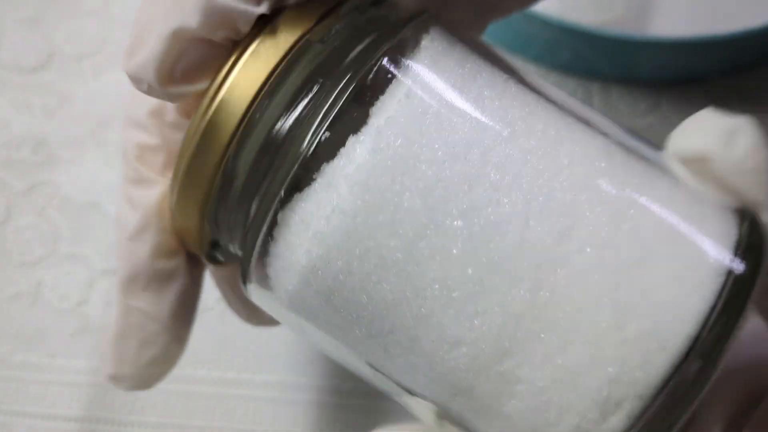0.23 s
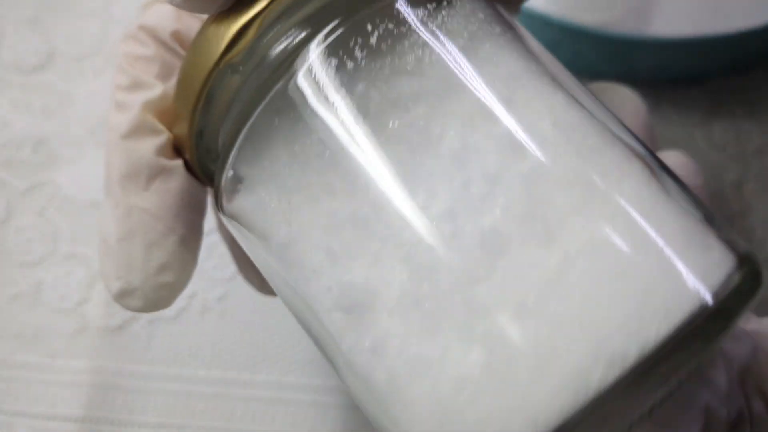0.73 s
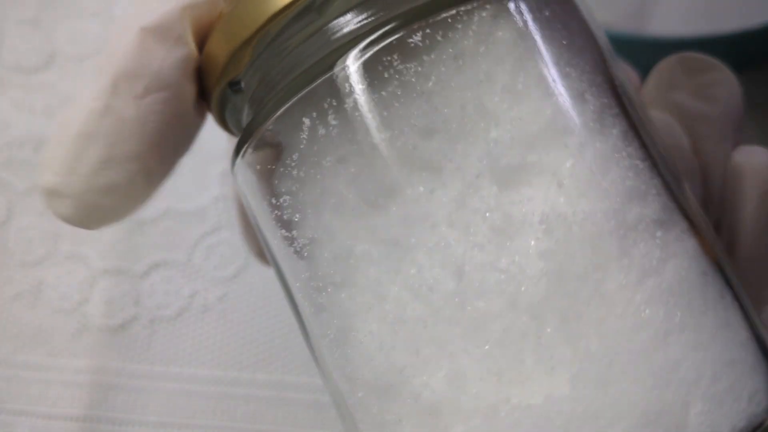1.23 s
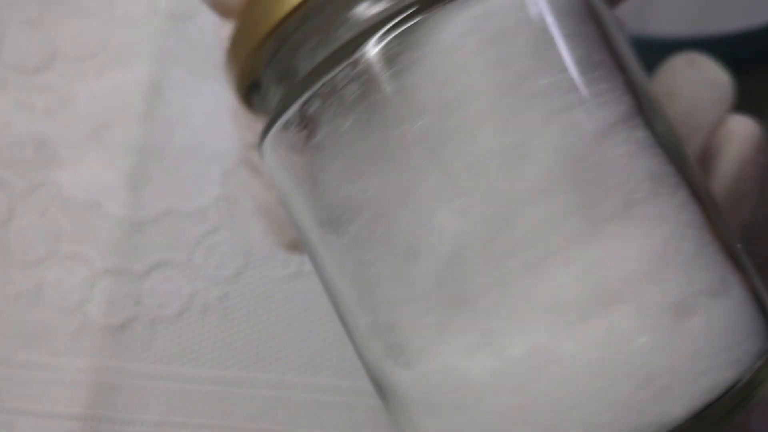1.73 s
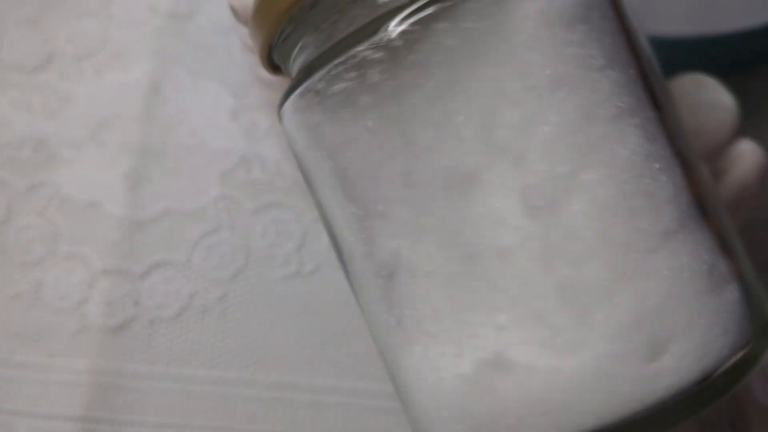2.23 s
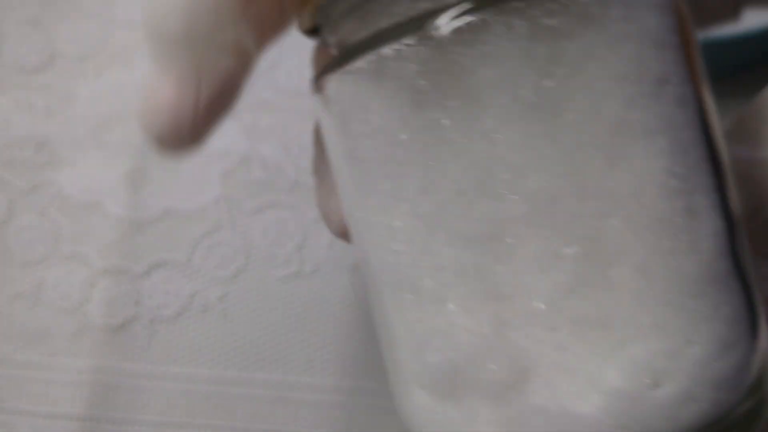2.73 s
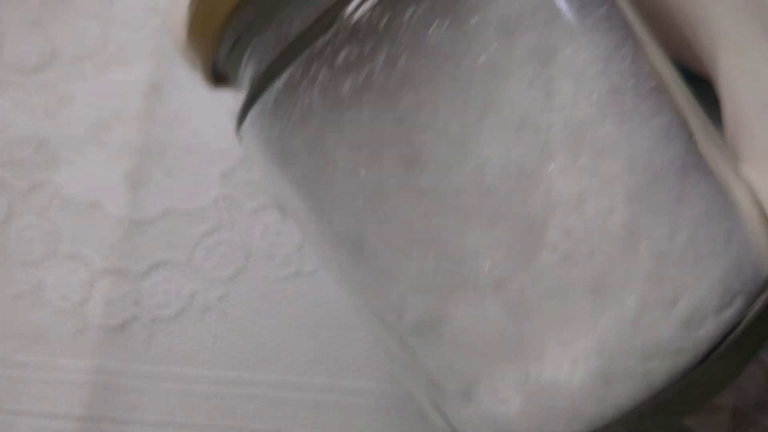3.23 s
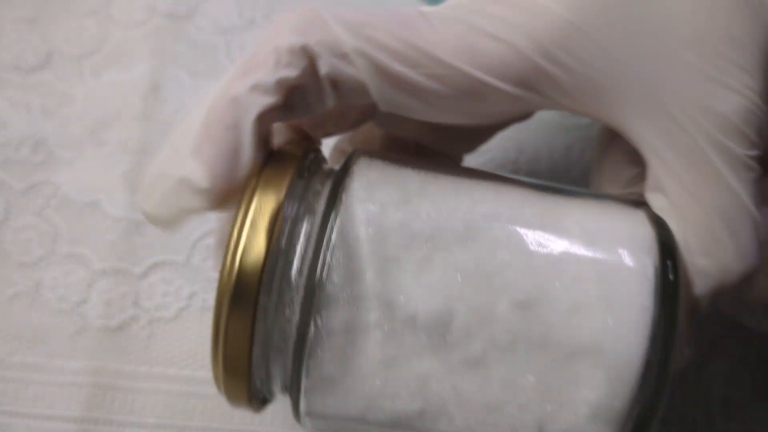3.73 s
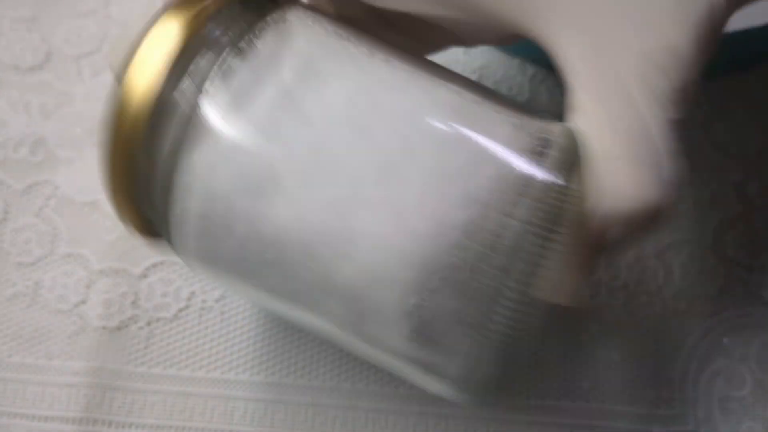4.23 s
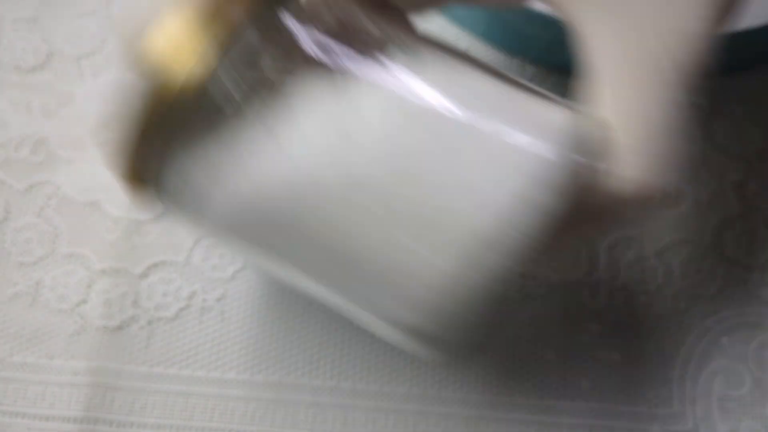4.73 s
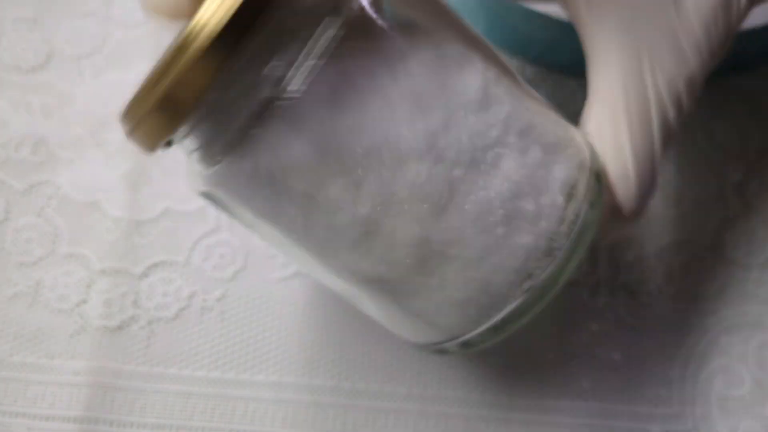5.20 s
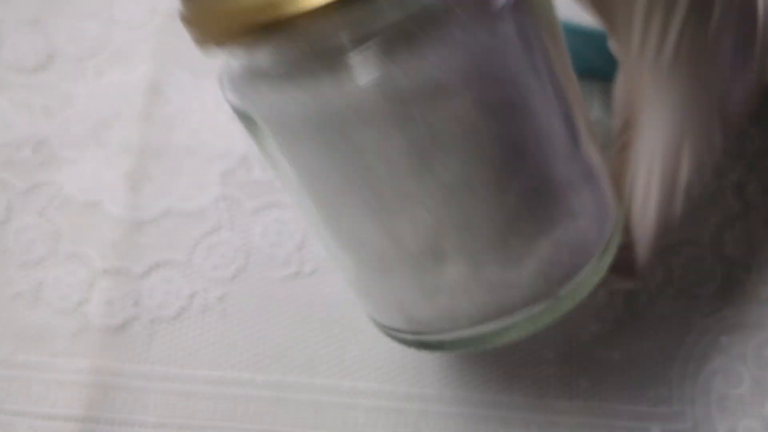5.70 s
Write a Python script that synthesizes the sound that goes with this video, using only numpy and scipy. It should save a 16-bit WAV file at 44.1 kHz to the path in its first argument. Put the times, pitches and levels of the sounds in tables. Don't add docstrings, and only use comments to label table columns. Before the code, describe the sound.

Gloved hands turn a glass jar of fine powder very close to a stereo microphone. Rubber ticks and a short glassy finger squeak come first, then soft sandy slides in slow turns. The jar is tipped, its metal lid knocks once, and five brisk shakes slam the powder with crisp clicks. Gritty slides finish it, over quiet room rumble and faint distant tyre hiss.

```python
import sys
import numpy as np
from scipy import signal
from scipy.io import wavfile
from scipy.ndimage import uniform_filter1d

SR = 44100
rng = np.random.default_rng(int(sys.argv[2]) if len(sys.argv) > 2 else 0)


def bounce(signal):
    frames = np.transpose(np.atleast_2d(signal))
    limited = np.clip(frames, -1, 1)
    pcm = np.round(limited * 32767).astype(np.int16)
    wavfile.write(sys.argv[1], SR, pcm)


def ratio_of_db(decibels):
    return 10 ** (np.asarray(decibels, float) / 20)


N = 262836
LEAD = 8


def evened(x):
    return x / np.sqrt(np.mean(np.atleast_2d(x).mean(0) ** 2) + 1e-20)


def read(points, hz):
    f, value = np.transpose(points)
    return np.interp(np.log(hz + 1), np.log(f + 1), value)


def follow(points):
    return ratio_of_db(np.interp(np.arange(N) / SR, *np.transpose(points)))


def ears(x, pan_db, lead):
    return np.array([x * ratio_of_db(pan_db / 2), np.roll(x, lead) * ratio_of_db(-pan_db / 2)])


def echoes(x, t60, db):
    t = np.arange(6000) / SR
    sparse = rng.random((2, 6000)) < .08
    taps = rng.standard_normal((2, 6000)) * sparse * ratio_of_db(-60 * t / t60) * (t > .0008)
    taps *= ratio_of_db(db) / np.linalg.norm(taps, axis=1)[:, None]
    return x + signal.oaconvolve(x, taps, axes=1)[:, :N]


# freq_hz, likeness (0 to 1)
PORT_LIKENESS = [(60, 1.0), (180, 0.97), (550, 0.56), (1650, 0.032), (4970, 0.0), (15000, 0.92)]


def hiss(spectrum, patchy_db, size):
    hz = np.fft.rfftfreq(size, 1 / SR)
    a, b, c, d, patches = rng.standard_normal((4 * N // size + 5, len(hz), 5)).T
    patches = uniform_filter1d(uniform_filter1d(patches, size=8, axis=0), size=6, axis=1)
    same = np.clip(read(PORT_LIKENESS, hz), -1, 1)[:, None]
    left = a + 1j * b
    right = same * left + np.sqrt(1 - same ** 2) * (c + 1j * d)
    outside = (hz < spectrum[0][0]) | (hz > spectrum[-1][0])
    gain_db = np.where(outside, -120, read(spectrum, hz))
    z = np.array([left, right]) * ratio_of_db(gain_db[:, None] + patchy_db * patches / patches.std())
    return evened(signal.istft(z, nperseg=size, noverlap=3 * size // 4)[1][:, :N])


# freq_hz, density_db (per Hz)
RUMBLE = [(24, -32), (36, -33), (45, -5), (62, 1), (75, -6), (100, -5), (112, -12), (137, -17),
          (165, -20.5), (210, -30.5), (330, -38.5)]
# freq_hz, density_db (per Hz)
FAN_BAND = [(105, -10.5), (115, -5), (125, 9.5), (133, -5), (140, -38)]
# time_s, level_db
FAN_LEVEL = [(0.0, -57), (0.58, -50), (1.16, -63), (1.23, -52), (1.84, -65.5), (2.87, -59), (4.81, -58.5),
             (5.96, -67)]


def building():
    rumble = ratio_of_db(-50) * hiss(RUMBLE, patchy_db=3.0, size=8192)
    hum = ratio_of_db(-56) * np.sin(2 * np.pi * 64 * np.arange(N) / SR)
    fan = ratio_of_db(-1) * follow(FAN_LEVEL) * hiss(FAN_BAND, patchy_db=-3.0, size=8192)
    return rumble + hum + fan


# freq_hz, density_db (per Hz)
ROOM_AIR = [(120, -5), (200, -28), (340, 7), (557, -6), (863, -81), (964, 6.5), (1310, -5), (2190, 3),
            (4010, -6), (7070, -1), (15800, -65)]


def room_air():
    return ratio_of_db(-78) * hiss(ROOM_AIR, patchy_db=1.5, size=1024)


# freq_hz, density_db (per Hz)
TYRE_HISS = [(230, -8), (400, -7.5), (560, -24.5), (700, -8.5), (850, -11), (975, 5), (1110, -5),
             (2000, -18), (4000, -27)]
# time_s, level_db
TYRE_LEVEL = [
    (0.0, -68),
    (1.61, -69),
    (2.92, -79),
    (3.2, -75),
    (3.73, -83.5),
    (5.13, -87),
    (5.33, -93),
    (5.68, -94),
    (5.96, -71),
]


def far_tyres():
    return follow(TYRE_LEVEL) * hiss(TYRE_HISS, patchy_db=1.0, size=512)


def grains():
    per_s, spread_db = 5000, 2.5
    crowding = uniform_filter1d(uniform_filter1d(rng.standard_normal(N), size=150), size=150)
    crowding = ratio_of_db(2.7 * crowding / crowding.std())
    out = np.zeros((2, N))
    for lead in (0, 3, 7, 8, 9, 16):
        size = ratio_of_db(spread_db * np.minimum(rng.exponential(1, N), 5)) * rng.choice([-1, 1], N)
        landing = rng.random(N) < per_s / 6 / SR
        out += echoes(ears(crowding * size * landing, 0, lead), t60=0.053, db=1.5)
    return out


# middle_s, length_s, grit_db,
# fineness_db
HEAP_SLIDES = [(.5, .064, -80, -28), (0.58, 0.14, -54, -1), (0.613, 0.072, -59, -8), (0.645, 0.07, -62, -4),
               (0.712, 0.13, -65, -5), (1.411, .12, -64.5, -16), (1.492, 0.053, -58.5, -16),
               (1.561, 0.22, -56.5, -3), (1.552, 0.1, -55, -0.5), (1.672, 0.26, -69, -5.5), (1.76, 0.13, -71, 3),
               (1.921, 0.23, -62, -1.5), (1.971, 0.066, -58.5, -6.5), (2.159, 0.13, -66, -5.5),
               (2.194, 0.058, -61.5, -5.5), (2.306, 0.037, -67, -5.5), (2.44, 0.14, -75, 5.5),
               (2.54, 0.32, -66.5, 0.5), (2.629, 0.083, -63, -1.5), (2.69, 0.13, -68.5, -4.5),
               (3.053, 0.25, -65, -11), (3.136, 0.2, -63.5, 0), (3.255, 0.18, -64, -7), (3.45, 0.42, -72.5, -1.5),
        (3.543, 0.2, -66.5, -5.5), (3.773, 0.08, -69.5, -16), (3.859, 0.05, -67.5, -9.5),
        (3.994, 0.16, -68, -15), (4.046, 0.09, -62.5, -6.5), (4.103, 0.064, -63, 0.5),
        (4.154, 0.21, -60, -3.5), (5.285, 0.18, -67, -4), (5.43, .3, -89, -1), (5.55, .1, -72.5, -1),
        (5.581, 0.072, -67, 7.5), (5.726, 0.11, -57.5, -9.5), (5.761, 0.047, -59.5, -1.5),
        (5.816, 0.21, -64, -6.5), (5.884, 0.068, -52.5, -3.5), (5.929, 0.11, -52.5, -4.5)]
# middle_s, throw_length_s, throw_db, return_db, whisk_db
SHAKES = [
    (4.331, .11, -56.5, -70, -84),
    (4.515, 0.099, -51.5, -70, -69.5),
    (4.703, 0.078, -48.5, -69.5, -65.5),
    (4.892, 0.098, -53.5, -68, -65.5),
    (5.09, 0.082, -49.5, -69, -64.5),
]


def slides():
    rows = [(*row, 0) for row in HEAP_SLIDES]
    for s, length, throw_db, return_db, _ in SHAKES:
        rows.append((s, length, throw_db, -2, 3))
        rows.append((s, 1.55 * length, throw_db - 6, -2, 0))
        rows.append((s + 0.1, 0.24, return_db, 0.5, 0))
    return rows


# time_s, trickle_db, pan_db (left-right)
FLOW = [(0.0, -78.5, -4), (0.63, -65.5, 2), (0.8, -76.5, -3.5), (1.191, -77, -0.5), (1.64, -64, -1),
        (2.16, -69.5, -1), (2.46, -64, 1), (2.97, -75, -1.5), (3.24, -66, -2), (3.67, -74, 1),
        (5.0, -75.5, 1), (5.51, -75, -1), (5.96, -87, 1.5)]
# freq_hz, density_db (per Hz)
POWDER = [(400, 2.5), (650, -13), (1300, 5), (1900, -1.5), (3000, 1), (5400, -2.5), (6800, -5.5), (8000, 0),
          (10000, -10.5), (12500, -6.5), (14000, -11.5), (15800, -15.5)]
# freq_hz, width_hz, level_db
WALL = [(673, 138, 12), (1935, 150, 6), (3900, 1000, -20), (7730, 530, -6), (10800, 1000, -12)]
BAND_EDGES = [450, 2000, 6500, 9500, 15800]
TRICKLE = [-9, -4.5, -8, -18.5]
BAND_PAN = [0, 1.5, 2, 3]


def powder(rain):
    hz, _, z = signal.stft(rain, SR, nperseg=256)
    drift = rng.standard_normal(z.shape[1:])
    drift = uniform_filter1d(uniform_filter1d(drift, size=5, axis=0), size=12, axis=1)
    wall = 1 + sum(ratio_of_db(db) / (1 + (2 * (hz - f) / width) ** 2) for f, width, db in WALL)
    z = z * (ratio_of_db(read(POWDER, hz)) * wall)[:, None] * ratio_of_db(2.4 * drift / drift.std())
    coloured = signal.istft(z, SR, nperseg=256)[1][:, :N]

    t = np.arange(N) / SR
    s, trickle_db, pan_db = np.transpose(FLOW)
    power = np.outer(ratio_of_db(TRICKLE), ratio_of_db(np.interp(t, s, trickle_db))) ** 2
    for middle, length, grit_db, fine_db, extra_db in slides():
        at = slice(round((middle - length / 2) * SR) + 1, round((middle + length / 2) * SR) - 1)
        swell = np.cos(np.pi * (t[at] - middle) / length) ** 3.2
        weight_db = extra_db - 6 - 0.4654 * (grit_db + 67.5)
        slide_db = 3.5 + 1.02 * fine_db
        bands_db = grit_db + np.array([weight_db, 0, slide_db, fine_db])
        power[:, at] += np.outer(ratio_of_db(bands_db), swell) ** 2

    out = np.zeros((2, N))
    for low, high, level, beam_db in zip(BAND_EDGES, BAND_EDGES[1:], np.sqrt(power), BAND_PAN):
        split = signal.butter(3, [low, high], "bp", fs=SR, output="sos")
        band = signal.sosfilt(split, coloured)
        out += evened(band * ratio_of_db([[beam_db / 2], [-beam_db / 2]])) * level
    return out * ratio_of_db(np.outer([.5, -.5], np.interp(t, s, pan_db)))


def crackle():
    per_s, level_db = 40, -69
    t = np.arange(300) / SR
    size = ratio_of_db(level_db + 3.4 * np.minimum(rng.exponential(1, N), 4)) * (rng.random(N) < per_s / SR)
    kind = rng.integers(0, 4, N)
    out = np.zeros((2, N))
    for k, hz in enumerate((2200, 3260, 4600, 6800)):
        pop = ratio_of_db(-60 * t / .0018) * np.sin(2 * np.pi * hz * t)
        out += ears(signal.oaconvolve(size * (kind == k), pop)[:N], 1.8, 3 * k - 2)
    return out


def ticks(rows):
    t, out = np.arange(800) / SR, np.zeros((2, N + 800))
    snap = signal.butter(2, [900, 8000], "bp", fs=SR)
    for s, db, hz, pan_db, share in rows:
        burst = rng.standard_normal(800) * ratio_of_db(-60 * t / .004)
        ring = signal.lfilter(*signal.iirpeak(hz, 1 / np.clip(share, .05, 1.5), SR), burst)
        tick = ring + 0.031 * signal.lfilter(*snap, burst)
        soft = signal.butter(1, min(3.2 * hz, .4 * SR), fs=SR)
        tick = signal.lfilter(*soft, tick)
        out[:, round(s * SR):][:, :800] += ears(ratio_of_db(db + 3) * tick / abs(tick).max(), pan_db, LEAD)
    return out[:, :N]


# start_s, peak_db, pitch_hz, pan_db (left-right)
GLOVE_TICKS = [(.2194, -59.5, 2690, 11), (0.2985, -52, 2960, -18), (0.317, -45.5, 1810, 3),
               (.331, -45, 5330, -4), (0.338, -55.5, 3280, 23), (0.412, -56.5, 2450, 18),
               (0.644, -42, 9000, 6), (0.968, -53.5, 2480, 0), (1.051, -47.5, 2490, 2),
               (1.1946, -56, 3450, 9), (1.3025, -46.5, 2470, 4), (1.5392, -44, 3450, 12),
               (1.749, -49, 2130, 0), (1.896, -47, 8400, 17), (1.9087, -46.5, 4130, 14.5),
               (2.192, -43, 1750, 5), (2.5302, -40, 5300, 1), (2.6108, -47, 6500, 13),
               (2.746, -54, 3030, 4), (2.912, -44, 1250, 1), (2.912, -44, 3540, 7.5), (3.137, -43, 6600, 3),
               (3.165, -38.5, 5100, 8), (3.201, -46.5, 7840, 12), (3.081, -44, 3000, 0),
               (3.495, -50, 6150, 11), (3.92, -53.5, 3060, 17), (3.865, -57, 4500, 8),
               (4.149, -58, 2030, 22), (0.0647, -54, 2480, 1), (.148, -62, 3500, 2), (.249, -59, 3500, 0),
               (0.299, -57, 7000, -4), (.694, -56, 2210, -2), (.717, -62, 3500, 0), (1.2536, -59, 2500, 1),
               (1.354, -56, 2690, 0), (1.3723, -63, 2520, 0), (2.1917, -47, 4400, -1),
               (2.424, -53, 8000, 8), (2.64, -46.5, 3000, 2), (3.137, -44.5, 2500, 7),
               (3.165, -46.5, 1200, 6), (3.305, -59, 5000, -6), (5.73, -48, 5300, 6), (5.874, -47, 4000, 6),
               (5.886, -46, 5000, 4)]


def glove_ticks():
    return ticks([(*row, .45) for row in GLOVE_TICKS])


def strikes(rows, modes, rise_hz_per_s=0):
    t, out = np.arange(1500) / SR, np.zeros(N + 1500)
    middle_s = np.mean(rows, 0)[0]
    for s, db, *tilt in rows:
        rise_hz = rise_hz_per_s * (s - middle_s)
        for hz, mode_db, t60 in modes:
            mix, tune = rng.standard_normal(2)
            bright_db = sum(tilt) * max(np.log2(hz / 2700), 0)
            decay = ratio_of_db(db + mode_db + bright_db + 2 * mix - 60 * t / t60)
            tone = np.sin(2 * np.pi * (hz * (1 + .008 * tune) + rise_hz) * t)
            out[round(s * SR):][:1500] += np.sign(tune) * decay * tone
    no_bass = signal.butter(1, 480, "hp", fs=SR, output="sos")
    return signal.sosfilt(no_bass, out[:N])


# start_s, peak_db, brightness_db (per octave)
SLIPS = [(.481, -59, -8), (.4895, -48, -13), (.5, -53, -5), (.507, -58, -6), (.527, -56, -3),
         (.5365, -53, -2), (.5498, -43, 2.5), (.5583, -43.5, 1), (.5753, -40, -4), (.5841, -41, -5),
         (.593, -46, -2)]
# freq_hz, level_db, t60_s
JAR = [(1290, -9, 0.013), (1600, -4, 0.0091), (2675, 4.5, 0.027), (3600, -7, 0.014), (4040, -6, 0.013),
       (5120, -2, 0.02), (6460, -2, 0.015), (6700, -7, .012), (7840, -25, 0.0088), (8750, -17, 0.012),
       (11400, -34, 0.0077)]


def finger_slips():
    slips = ears(strikes(SLIPS, JAR, rise_hz_per_s=1600), 5.5, LEAD + 1)
    return echoes(slips, t60=0.0086, db=-0.5)


def tuned_rubs(rain, rows):
    out = np.zeros((2, N))
    for s, length, db, hz, glide_hz, pan_db, share in rows:
        at = slice(round((s - length / 2) * SR), round((s + length / 2) * SR))
        count = at.stop - at.start
        turn = np.exp(2j * np.pi * np.cumsum(hz + glide_hz * np.linspace(-.5, .5, count)) / SR)
        r = np.exp(-np.pi * max(share * hz, 70) / SR)
        tuned = (turn * signal.lfilter([1], [1, -2 * r, r * r], rain[:, at] / turn)).real
        swell = signal.windows.tukey(count, .8)
        out[:, at] += ratio_of_db(db) * evened(tuned) * swell * ratio_of_db([[pan_db / 2], [-pan_db / 2]])
    return out


# middle_s, length_s, level_db, pitch_hz
SCRAPES = [(1.063, 0.011, -78, 2470), (1.094, .012, -72, 2400), (1.127, .012, -72, 2400),
           (1.159, .014, -71, 2420), (3.032, 0.069, -72, 1800), (3.083, .018, -66, 696),
           (3.115, .05, -63, 6700), (3.262, .02, -59.5, 3400), (3.271, 0.039, -65, 1830),
           (3.325, .02, -73, 2320), (1.554, 0.041, -58, 3680), (1.544, 0.032, -57, 5300),
           (0.64, 0.073, -75, 2200), (2.543, 0.051, -62, 5200), (3.265, 0.03, -70, 2520),
           (3.243, 0.044, -66, 3480), (3.56, .15, -79, 7900), (5.563, 0.096, -71, 8000),
           (2.918, 0.015, -68, 1080), (5.147, 0.035, -71, 2500), (5.828, 0.075, -64, 2250),
           (1.79, 1, -74.5, 242), (2.735, 0.31, -76.5, 330), (3.13, 0.061, -67.5, 340),
           (3.25, 0.089, -71, 318), (5.109, 0.12, -66, 260), (5.745, 0.062, -72.5, 313)]
# middle_s, length_s, level_db, pitch_hz
RUBS = [(5.586, 0.059, -65, 3950), (1.553, 0.064, -64, 3470), (2.2, 0.054, -65, 1900),
        (3.7, 0.042, -61.5, 5900), (3.98, 0.09, -73.5, 3200), (2.15, 0.057, -68, 1850),
        (2.39, .12, -71, 1900), (2.5, 0.047, -66, 1800), (2.445, .11, -73, 8000), (2.62, .035, -60, 6600),
        (.77, 0.065, -74, 2900), (3.387, .016, -61, 3200)]


def scrapes(rain):
    clear = [(*row, 0, 3, .065) for row in SCRAPES]
    loose = [(*row, 0, 3, .18) for row in RUBS]
    return tuned_rubs(rain, clear + loose)


# start_s, peak_db, pitch_hz, ring_width (share
SMALL_TICKS = [(.6845, -56, 1900, .2), (0.6935, -52, 2000, .2), (.7025, -57, 3500, .2),
               (.7177, -51, 3530, .12), (.748, -61, 3500, .2), (.757, -61, 2400, .15),
               (.7771, -57, 3100, .2), (.786, -60, 2300, .3), (.799, -59, 2200, .3), (.862, -63, 5600, .5),
               (.914, -66, 4800, .3), (.923, -66, 5500, .3), (2.1917, -55, 2900, .6),
               (2.294, -57, 2400, .15), (2.36, -55, 1900, .2), (2.992, -58, 2400, .15),
               (3.165, -52, 2600, .6), (3.3637, -36, 3200, .5), (3.364, -39, 13000, .6),
               (3.41, -58, 8000, .15), (3.92, -48, 3500, .2), (3.9588, -58, 3060, .3),
               (4.094, -50, 3300, .4), (4.1483, -43, 2010, .25), (4.179, -47, 2830, .2),
               (5.537, -61, 8000, .2), (.2987, -59, 11000, .8), (0.318, -48, 3000, .3),
               (4.6405, -47, 12500, .15), (4.727, -44, 11000, 1), (4.82, -41, 12800, .2),
               (5.319, -54, 1750, .15), (5.56, -52.5, 3600, .15), (5.934, -44, 2600, .6),
               (2.1922, -44.5, 5500, .6)]


def small_ticks():
    rows = [(s, db, hz, 0, share) for s, db, hz, share in SMALL_TICKS]
    return echoes(ticks(rows), t60=0.024, db=-2)


# start_s, peak_db, favoured_pitch_hz
CLUMPS = [(4.316, -54, 1790), (4.326, -37.5, 4480), (4.328, -59, 630), (4.338, -40, 8100),
          (4.338, -53, 1790), (4.348, -47, 5150), (4.358, -43, 8100), (4.499, -50, 1790),
          (4.501, -43, 8800), (4.505, -51, 3700), (4.512, -56, 630), (4.519, -45.5, 1790),
          (4.518, -40, 5150), (4.523, -37.5, 9260), (4.538, -53, 1790), (4.544, -50, 8100),
          (4.687, -55, 8100), (4.694, -42, 5150), (4.696, -48, 8100), (4.699, -44.5, 1790),
          (4.708, -43, 8100), (4.713, -43, 3700), (4.714, -59, 630), (4.726, -52, 1790),
          (4.7255, -43, 8100), (4.88, -44, 5150), (4.885, -37, 5730), (4.886, -44, 1790),
          (4.892, -35, 8100), (4.891, -55, 630), (4.9, -56, 630), (4.903, -38.5, 3870), (4.908, -41, 8100),
          (5.011, -41.5, 8100), (5.068, -45, 8100), (5.072, -52, 5150), (5.08, -46, 1790),
          (5.083, -38, 3870), (5.083, -39, 8100), (5.087, -45, 5150), (5.0922, -29, 3870), (5.09, -58, 630),
          (5.094, -40, 1790), (5.101, -51, 1790), (5.107, -45, 8100), (5.113, -49, 8100),
          (5.163, -57, 7540), (5.222, -54, 8800), (5.582, -50, 5730), (1.677, -52, 8100),
          (1.704, -61, 1790), (1.768, -56, 3700), (1.82, -57, 8100), (1.842, -51, 3700), (1.86, -49, 8100),
          (1.88, -57, 8100), (3.851, -61, 2900), (4.017, -53, 5640), (4.163, -56, 5150), (4.182, -50, 2940)]
# freq_hz, t60_s
GLASS = [(630, 0.067), (1790, 0.029), (2900, 0.0049), (3680, 0.03), (3900, 0.019), (5150, 0.024),
         (5730, 0.0094), (8100, 0.017), (9260, 0.029), (11200, .007)]


def clumps():
    crumble_s, reach_db_per_octave = 0.0013, -21
    t, out = np.arange(1500) / SR, np.zeros(N)
    for s, db, pitch_hz in CLUMPS:
        ring = np.zeros(1500)
        for hz, t60 in GLASS:
            mode_db = reach_db_per_octave * abs(np.log2(hz / pitch_hz))
            detuned_hz = hz * (1 + 0.0096 * rng.standard_normal())
            ring += ratio_of_db(mode_db - 60 * t / t60) * np.sin(2 * np.pi * detuned_hz * t)
        crumble = rng.standard_normal(200) * np.exp(-t[:200] / crumble_s)
        hit = np.convolve(crumble, ring)[:1500]
        out[round(s * SR):][:1500] += ratio_of_db(db) * hit / abs(hit).max()
    return echoes(ears(out, 8.5, LEAD), t60=0.05, db=-8)


# start_s, peak_db
KNOCK = [
    (3.3632, -36),
    (3.3635, -25),
    (3.3641, -23.5),
    (3.3648, -24.5),
    (3.3653, -35),
    (3.3672, -30.5),
    (3.3676, -50),
    (3.3695, -46),
    (3.3725, -51),
]
# freq_hz, level_db, t60_s
LID = [(710, -6, 0.019), (4650, -8, 0.0053), (1024, -3, 0.02), (1140, -14.5, 0.016), (1810, -1, 0.012),
       (2030, 1, 0.01), (2560, 0.5, 0.012), (2970, 7.5, 0.0094), (3450, -0.5, 0.0092), (3900, 3, 0.0082),
       (5750, 5, 0.0049), (6500, 0, 0.0044), (8100, 6.5, 0.0041), (11300, 3, 0.0025)]


def lid_knock():
    blow = strikes(KNOCK, LID) * ratio_of_db(-8)
    thud = signal.sosfilt(signal.butter(2, 1700, fs=SR, output="sos"), blow)
    knock = ears(thud, -1, LEAD - 2) + ears(blow - thud, 5, LEAD + 2)
    return echoes(knock, t60=0.053, db=-9)


# start_s, peak_db, pitch_hz, ring_width (share of pitch)
LUMP_TICKS = [(4.294, -46.5, 3290, 0.26), (4.5392, -35.5, 8200, 0.14), (4.642, -43, 7600, 0.29),
              (4.641, -53.5, 1810, 0.19), (4.7074, -31, 4600, 0.72), (4.7716, -56, 7430, .3),
              (4.82, -41.5, 7840, 0.35), (4.818, -50, 1520, 0.38), (4.87, -40.5, 5030, 0.33),
              (4.891, -44, 3900, 0.44), (5.0102, -54.5, 1800, 0.28), (5.018, -40.5, 6330, 1.6),
              (5.093, -30.5, 3760, 0.089), (5.1627, -57, 7540, .3), (5.2105, -46, 6000, 1.8),
              (5.2775, -41, 4500, 1.6), (5.684, -64, 7500, 0.35), (5.933, -35, 4300, 0.49)]


def lump_ticks():
    return ticks([(s, db, hz, 9, share) for s, db, hz, share in LUMP_TICKS])


# after_throw_s, length_s, level_db, pitch_hz, glide_hz
WHISKS = [
    (0.084, 0.058, 0.5, 7700, -900),
    (0.086, 0.06, -8, 13100, -300),
    (0.123, .035, 1.5, 8500, 600),
    (0.122, .035, -4, 12200, -500),
    (0.027, 0.038, -2, 12200, -400),
]


def whisks(rain):
    rows = []
    for s, _, _, _, whisk_db in SHAKES:
        for after, length, db, hz, glide_hz in WHISKS:
            rows.append((s + after, length, whisk_db + db, hz, glide_hz, -6, 1000 / hz))
    return tuned_rubs(rain, rows)


def scene():
    rain = grains()
    place = building() + room_air() + far_tyres()
    snaps = echoes(crackle() + glove_ticks() + lump_ticks(), t60=.035, db=-6)
    hands = snaps + finger_slips() + small_ticks() + lid_knock()
    heap = powder(rain) + scrapes(rain) + clumps() + whisks(rain)
    return place + hands + heap


def low_pass(x):
    return signal.sosfilt(signal.butter(12, 16540, fs=SR, output="sos"), x)


def record(dry):
    limited = signal.oaconvolve(dry, signal.firwin(255, 15900, fs=SR)[None], "same")
    mix = limited * np.minimum(np.arange(N) / SR / .008, 1)
    return low_pass(mix)


dry = scene()
out = record(dry)
bounce(out)
```